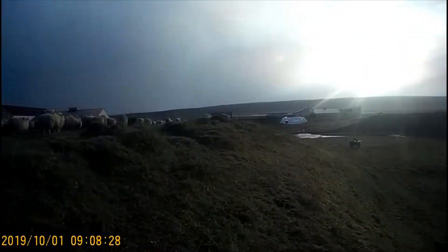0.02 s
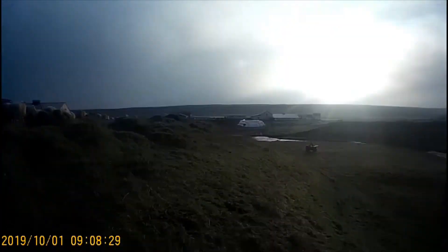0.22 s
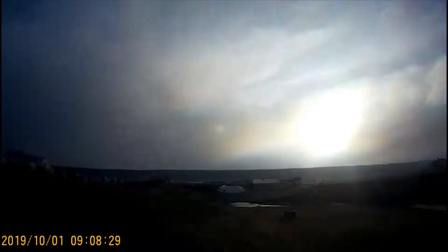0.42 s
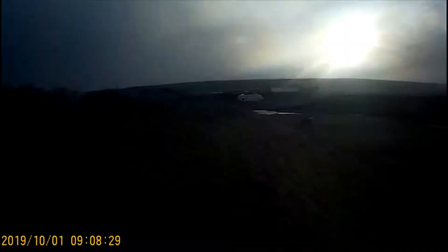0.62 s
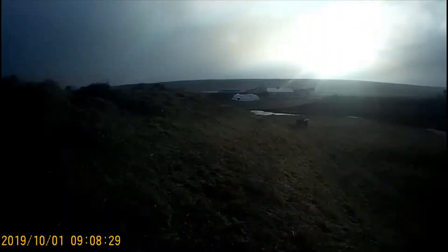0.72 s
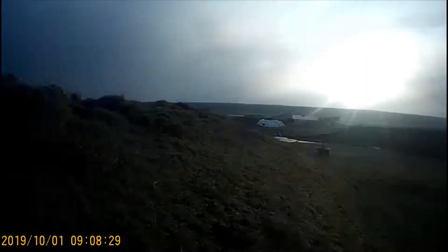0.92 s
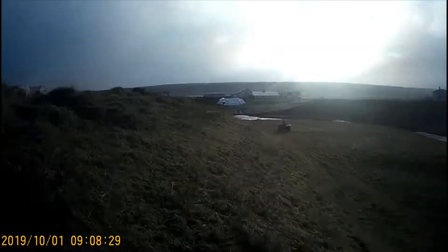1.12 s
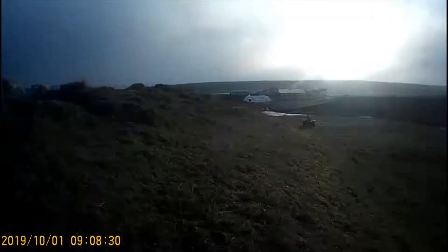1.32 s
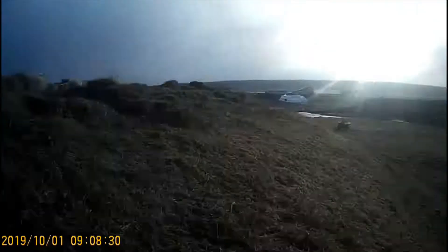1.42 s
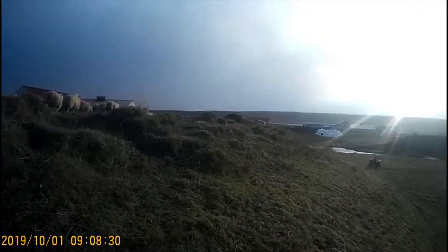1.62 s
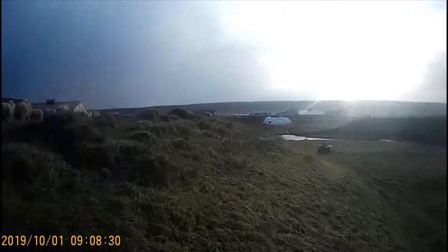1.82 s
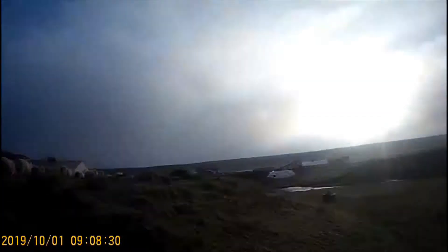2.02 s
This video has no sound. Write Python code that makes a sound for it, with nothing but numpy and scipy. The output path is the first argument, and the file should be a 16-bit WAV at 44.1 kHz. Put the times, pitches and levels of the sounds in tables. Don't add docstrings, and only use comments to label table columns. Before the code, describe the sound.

Brisk footsteps in rough grass on open ground: low muffled thumps with dry swishes and small hard taps, strongest near 0.7 and 1.4 seconds, wind buffets bumping a small enclosed microphone carried by the walker.

```python
import sys
import numpy as np
from scipy import signal
from scipy.io import wavfile
from scipy.ndimage import uniform_filter1d

SR = 44100
rng = np.random.default_rng(int(sys.argv[2]) if len(sys.argv) > 2 else 0)


def generate_wav(signal):
    frames = np.transpose(np.atleast_2d(signal))
    scaled = np.clip(frames, -1, 1) * 32767
    pcm = np.round(scaled).astype(np.int16)
    wavfile.write(sys.argv[1], SR, pcm)


def decibels_to_gain(level_db):
    exponent = np.asarray(level_db, float) / 20
    return 10 ** exponent


N = 92610
TREBLE_END_HZ = 15400


def rms_one(x):
    return x / np.sqrt(np.mean(x ** 2) + 1e-20)


def below(x, hz):
    return signal.sosfilt(signal.cheby1(6, 1, hz, fs=SR, output="sos"), x)


def above(x, order, hz):
    return signal.sosfilt(signal.butter(order, hz, "high", fs=SR, output="sos"), x)


def drift(rate_hz):
    r = np.exp(-2 * np.pi * rate_hz / SR)
    wander = signal.lfilter([1], [1, -2 * r, r * r], rng.standard_normal(N + SR))
    return rms_one(wander[SR:])


def evened(x, share, size):
    power = np.maximum(uniform_filter1d(x ** 2, size=size), 1e-9)
    return rms_one(x / power ** (np.clip(share, 0, 1) / 2))


def swells(start_s, swell_s, hold_s, level_db, fall_db_per_s, bend=0):
    t = np.arange(N) / SR
    gain = 0
    for s, swell, hold, db in zip(start_s, swell_s, hold_s, level_db):
        climb_db = 25 * np.maximum(s - t, 0) / max(swell, .002)
        after_s = t - s - hold
        fall_db = fall_db_per_s * np.maximum(after_s, 0) + bend * np.clip(after_s, 0, .1) ** 2
        gain = gain + decibels_to_gain(db - climb_db - fall_db)
    return gain


def resonances(x, table):
    out = 0
    for k, (hz, width_hz, db) in enumerate(table):
        r = np.exp(-np.pi * 1.5 * width_hz / SR)
        b = (1 - r * r) / 2 * np.array([1, 0, -1])
        a = [1, -2 * r * np.cos(2 * np.pi * hz / SR), r * r]
        once = signal.lfilter(b, a, x[k % 2])
        out = out + decibels_to_gain(db) * signal.lfilter(b, a, once)
    return out


def rings(table, ring_s, gain_db):
    t = np.arange(N) / SR
    out = 0
    for s, hz, db in table:
        bump = np.exp(-.5 * ((t - s) / ring_s) ** 2)
        out = out + decibels_to_gain(db + gain_db) * np.cos(2 * np.pi * hz * (t - s)) * bump
    return out


# time_s, level_db
WIND_GUSTS = [(0.0, -35.5), (0.12, -42), (0.34, -35), (0.67, -47), (0.81, -25), (0.87, -37), (0.93, -26),
              (1.06, -38), (1.15, -50.5), (1.37, -26), (1.51, -34), (1.76, -37), (1.9, -43), (2.1, -40.5)]


def wind():
    s, db = np.transpose(WIND_GUSTS)
    band = signal.butter(1, [14, 31.5], "band", fs=SR, output="sos")
    air = signal.sosfilt(band, rng.standard_normal(N + SR))[SR:]
    air = evened(below(air, 90.4), 0.3, size=2500)
    gust_db = np.interp(np.arange(N) / SR, s, db)
    lumps_db = 4 * drift(15.6)
    return air * decibels_to_gain(gust_db + lumps_db)


# middle_s, length_s, level_db
PUFFS = [
    (0.677, 0.0069, -6.5),
    (0.728, 0.04, -9),
    (0.739, 0.017, -10),
    (1.376, .01, -3),
]


def puffs():
    t = np.arange(N) / SR
    return sum(decibels_to_gain(db) * np.exp(-.5 * ((t - s) / (length_s / 3)) ** 2) for s, length_s, db in PUFFS)


SUCTION_TIMES = [.27, .325, .395, .505, .625, .665, .695, .756, .84, .991, 1.056, 1.375, 1.45, 1.768, 1.826]
# length_s, level_db
SUCTION_SHAPES = [(0.036, -17.5), (0.054, -18), (0.038, -18), (0.019, -22), (0.016, -20.5), (0.028, -11.5),
                  (0.018, -11), (0.052, -6.5), (0.049, -18.5), (0.027, -6), (0.025, -10.5), (0.0082, 0.5),
                  (0.046, -12.5), (0.052, -13), (0.035, -13.5)]


def port_pressure():
    t = np.arange(N) / SR
    rebound, leak_hz = 0.5, 7
    drops = 0
    for s, (length_s, db) in zip(SUCTION_TIMES, SUCTION_SHAPES):
        u = (t - s) / (length_s / 3)
        drops = drops - decibels_to_gain(db) * (1 - rebound * u ** 2) * np.exp(-.5 * u ** 2)
    return above(drops + puffs(), 1, leak_hz)


# time_s, level_db
SNAPS = [
    (.428, -34),
    (.539, -35),
    (.546, -40),
    (1.055, -48),
    (1.71, -46),
    (1.83, -47),
]


def snaps():
    clicks = np.zeros(N)
    for s, db in SNAPS:
        clicks[int(s * SR)] = decibels_to_gain(db)
    crack = rng.standard_normal(80) * np.exp(-np.arange(80) / 12.0)
    softened = signal.lfilter([.4], [1, -.75], np.convolve(clicks, crack)[:N])
    return above(softened, 2, 3500)


# time_s, pitch_hz, level_db
JOLTS = [(0.2289, 128, -23), (0.2678, 317, -33), (0.2744, 138, -13), (0.412, 141, -14.5),
         (0.4275, 318, -23.5), (0.4783, 151, -25), (0.6876, 297, -27.5), (0.6927, 145.5, -9.5),
         (0.7875, 120.7, -21), (0.9044, 285, -27.5), (0.9342, 137, -27.5), (0.9687, 285, -26.5),
         (1.0022, 282.6, -24.5), (1.0534, 136, -23), (1.1327, 141.5, -19.5), (1.2185, 131, -24.5),
         (1.4021, 133, -16), (1.4448, 156, -23.5), (1.4914, 129, -25), (1.5284, 133, -22.5),
         (1.5828, 158, -24), (1.769, 147, -28), (1.771, 247, -31.5), (1.817, 134, -23)]


def jolts():
    return rings(JOLTS, ring_s=.012, gain_db=-3)


# start_s (full level), swell_s, hold_s, level_db, hollow_db (hollow part)
THUMPS = [(0.0, 0.026, 0.034, -35.5, 0), (0.082, 0.09, 0.095, -58, 2.5), (0.215, 0.024, 0.016, -25.5, -6),
          (0.258, 0.021, 0.018, -25, -4.5), (0.304, 0.058, 0.095, -40.5, 2.5),
          (0.41, 0.037, 0.013, -24, -9), (0.448, 0.074, 0.044, -39, 3.5), (0.524, 0.07, 0.042, -41, -8.5),
          (0.684, 0.059, 0.016, -15, -8.5), (0.713, 0.028, 0.049, -20.5, -14.5),
          (0.781, 0.028, 0.09, -36.5, -13.5), (0.874, 0.093, 0.032, -39, 6),
          (0.973, 0.094, 0.036, -30, -2.5), (1.051, 0.05, 0.0058, -19, -12.5),
          (1.128, 0.017, 0.032, -33, -4), (1.2, 0.099, 0.038, -36, -7), (1.393, 0.11, 0.01, -19, -13),
          (1.433, 0.014, 0.011, -25.5, -4.5), (1.526, 0.16, 0.069, -33.5, -6.5),
          (1.679, 0.044, 0.051, -51.5, 1.5), (1.759, 0.052, 0.0065, -31, 4),
          (1.809, 0.011, 0.013, -21.5, -18.5), (1.856, 0.037, 0.099, -39, -4.5),
          (2.063, 0.11, 0.039, -45.5, -1.5)]
# pitch_hz, width_hz, level_db
CASE_LOW = [(89.4, 13.8, -1.5), (125.1, 39, 1.5)]
# pitch_hz, width_hz, level_db
CASE_HOLLOW = [(200, 42, 2.5), (256, 12, -3.5), (280.7, 64, 3.5), (346.7, 57, -4.5), (443, 283, -10.5)]


def thumps():
    s, swell_s, hold_s, db, hollow_db = np.transpose(THUMPS)
    shake_db, fall_db_per_s = -2, 594
    shake = resonances(rng.standard_normal((2, N)), CASE_LOW)
    shake = below(evened(shake, 0.68, size=500), 186)
    hollow = resonances(rng.standard_normal((2, N)), CASE_HOLLOW)
    hollow = evened(hollow, 0.057, size=700)
    shake_gain = swells(s, swell_s, hold_s, db + shake_db, fall_db_per_s) + decibels_to_gain(-46)
    hollow_gain = swells(s, swell_s, hold_s, db + hollow_db, fall_db_per_s) + decibels_to_gain(-55.0)
    return shake * shake_gain + hollow * hollow_gain


# time_s, pitch_hz (of the panel), level_db
KNOCKS = [(0.051, 1375, -28.5), (0.251, 1750, -30.5), (0.266, 1810, -36), (0.27, 1116, -29),
          (0.276, 1650, -38), (0.28, 1190, -38), (0.348, 1310, -30.5), (0.403, 1365, -30),
          (0.415, 1875, -30.5), (0.428, 1180, -30), (0.448, 1210, -29), (0.449, 3600, -37),
          (0.467, 1590, -34), (0.467, 1920, -33), (0.472, 1150, -49), (0.682, 1930, -30),
          (0.691, 1293, -18.5), (0.698, 1790, -28), (0.698, 3410, -37), (0.7, 703, -22.5),
          (0.865, 1405, -33), (0.883, 1660, -39), (0.893, 1855, -32), (0.895, 1145, -26.5),
          (0.908, 1210, -30), (0.91, 1580, -32), (0.911, 2125, -31), (0.991, 1240, -31), (1.002, 1247, -26),
          (1.392, 1237, -13), (1.394, 1820, -22.5), (1.403, 758, -19), (1.499, 1400, -30.5),
          (1.542, 1220, -21.5), (1.543, 1830, -34), (1.555, 1960, -45), (1.556, 1360, -21),
          (1.573, 1383, -23), (1.575, 2090, -34), (1.591, 1534, -27.5),
          (0.706, 473, -21.5),
    (0.744, 1260, -33),
    (1.391, 1000, -21),
    (1.401, 390, -23.5),
    (2.023, 1186, -45),
    (.02, 1290, -38),
    (0.659, 1340, -37),
]


def knocks():
    return rings(KNOCKS, ring_s=0.0037, gain_db=-0.5)


def fibres():
    slips_per_s, spread_db = 2500, 0.5
    sizes = decibels_to_gain(spread_db * np.minimum(rng.exponential(1, (2, N)), 4))
    sizes = sizes * rng.choice([-1, 1], (2, N))
    slips = rms_one(sizes * (rng.random((2, N)) < slips_per_s / SR))
    return rms_one(slips + 1.93 * rng.standard_normal((2, N)))


# start_s (full level), swell_s, hold_s, level_db, brightness_db
SWISHES = [(0.0, 0.071, 0.082, -34, -0.5), (0.099, 0.0092, 0.063, -44, -2.5),
           (0.202, 0.0046, 0.054, -41.5, -4.5), (0.258, 0.051, 0.024, -28.5, 0.5),
           (0.392, 0.13, 0.096, -29.5, 5), (0.517, 0.033, 0.072, -48, 0.5), (0.689, 0.049, 0.01, -20.5, -1),
           (0.73, 0.015, 0.033, -37.5, -7), (0.868, 0.14, 0.032, -33.5, 2), (0.906, 0.079, 0.017, -31.5, 2),
           (0.983, 0.099, 0.024, -31, 0), (1.026, 0.042, 0.087, -38, 0.5),
           (1.131, 0.025, 0.085, -34.5, 5.5), (1.229, 0.044, 0.074, -43, 2), (1.332, 0.0085, 0.084, -45, 3),
           (0.671, 0.0054, 0.0092, -58, 16.5), (1.389, 0.026, 0.0093, -20, -4),
           (1.436, 0.01, 0.052, -43, 0.5), (1.537, 0.14, 0.053, -28.5, 1.5), (1.598, 0.0087, 0.023, -38, 4),
           (1.7, 0.021, 0.027, -51.5, 7.5), (1.755, 0.02, 0.011, -33.5, -0.5),
           (1.894, 0.28, 0.069, -43.5, 2.5), (2.018, 0.014, 0.063, -51.5, -1)]
# pitch_hz, width_hz, level_db
CASE_MID = [(356, 236, 1.5), (612, 220, -8), (769, 224, 3.5), (1000, 40, -39), (1181, 201, 9),
            (1678, 187, -1), (1888, 100, 1), (1959, 135, -1.5)]
# pitch_hz, width_hz, level_db
CASE_HIGH = [(2760, 340, 10.5), (2970, 526, 11.5), (3460, 450, 14.5), (3900, 440, 6)]
# pitch_hz, width_hz, level_db
CASE_TOP = [(4400, 840, 3.5), (5980, 490, 1), (7800, 1400, -8), (9860, 4600, -11)]


def swishes():
    s, swell_s, hold_s, db, bright_db = np.transpose(SWISHES)
    fall_db_per_s, fall_bend = 1094, 3000
    floor_db = -59.5
    flicker = decibels_to_gain(1.2 * drift(21))
    high_db = db + bright_db - 17
    top_db = 0.74 * (db + 30) - 32.5 + 1.52 * bright_db - 31.5
    bands = [(CASE_MID, db, 2325), (CASE_HIGH, high_db, 3895), (CASE_TOP, top_db, TREBLE_END_HZ)]
    out = 0
    for table, level_db, edge_hz in bands:
        rub = fibres() * flicker
        stroke = swells(s, swell_s, hold_s, level_db, fall_db_per_s, fall_bend)
        stroke = stroke + decibels_to_gain(floor_db + np.mean(level_db - db))
        heard = below(resonances(rub * stroke, table), edge_hz)
        out = out + heard / np.std(resonances(rub, table))
    dip_hz, dip_width_hz = 898.5, 293
    return signal.lfilter(*signal.iirnotch(dip_hz, dip_hz / dip_width_hz, fs=SR), out)


def scene():
    grass = swishes() + knocks()
    stride = thumps() + jolts()
    weather = wind() + port_pressure()
    return (grass + stride + weather + snaps())[None]


# middle_s, length_s, lowest_lost_hz, valley_share (0 to 1, also lost under the top resonance)
DROPOUTS = [(.057, .019, 3800, .7), (.162, .021, 3800, 0), (.459, .018, 4200, 0), (.708, .012, 11000, .7),
            (.721, .017, 3700, 1), (.759, .019, 3800, 1), (.886, .019, 3800, .6), (1.036, .024, 3750, 1),
            (1.207, .018, 4000, .6), (1.569, .012, 4000, .4), (1.613, .021, 4000, .5), (1.782, .02, 750, 0)]
# low_hz, high_hz
VALLEY = [2400, 3200]


def drop_treble(x):
    x, t = x.copy(), np.arange(N) / SR
    for s, length_s, hz, valley_share in DROPOUTS:
        near = slice(max(int((s - .1) * SR), 0), int((s + .1) * SR))
        high = signal.butter(6, hz, "high", fs=SR, output="sos")
        treble = signal.sosfiltfilt(high, x[:, near])
        band = signal.butter(4, VALLEY, "band", fs=SR, output="sos")
        valley = signal.sosfiltfilt(band, x[:, near] - treble)
        lost = np.clip(1.7 - 3.3 * np.abs(t[near] - s) / length_s, 0, 1)
        lost = lost * (1 - decibels_to_gain(-36))
        x[:, near] -= lost * (treble + valley_share * valley)
    return x


# time_s, pitch_hz, level_db
HELD_TONES = [(.054, 3550, -51), (.059, 3680, -64), (.456, 3150, -57), (.462, 2760, -54),
              (.706, 3210, -43.5), (.722, 3300, -65), (.759, 3530, -55.5), (.886, 2930, -43.5),
              (1.036, 3430, -61), (1.206, 2930, -48), (1.207, 2090, -47), (1.609, 3460, -52),
              (1.782, 1175, -33), (1.783, 1648, -42), (1.43, 738, -36), (1.555, 476, -30)]


def held_tones():
    return rings(HELD_TONES, ring_s=.011, gain_db=-0.76)


def band_limit(x):
    return signal.sosfilt(signal.butter(12, 15700, fs=SR, output="sos"), x)


def record(dry):
    overload, hiss_db = 1.2, -64.5
    x = overload * np.tanh(dry / overload)
    x = x + decibels_to_gain(hiss_db) * rng.standard_normal(dry.shape)
    x = drop_treble(x) + held_tones()
    x = signal.sosfilt(signal.cheby2(6, 32, 1.055 * TREBLE_END_HZ, fs=SR, output="sos"), x)
    return band_limit(x)


dry = scene()
out = record(dry)
generate_wav(out)
```